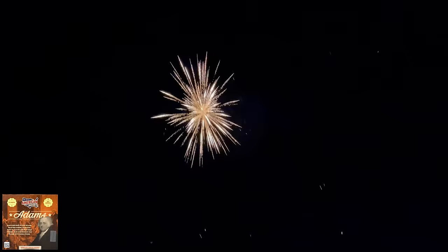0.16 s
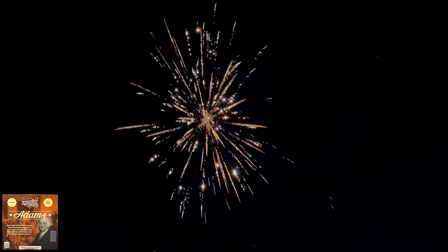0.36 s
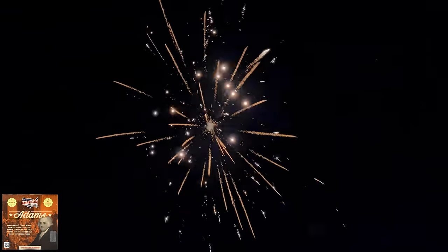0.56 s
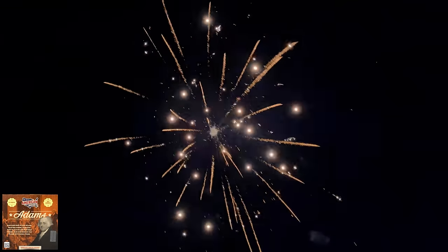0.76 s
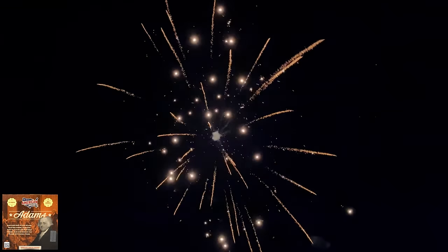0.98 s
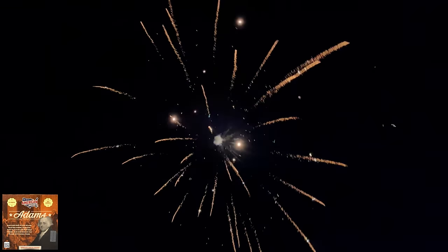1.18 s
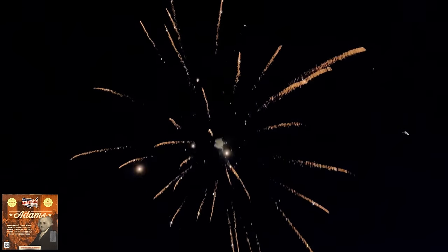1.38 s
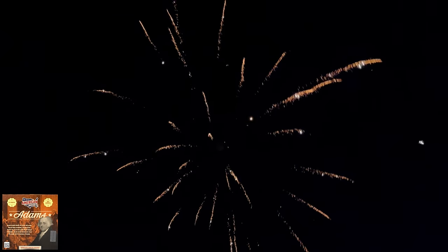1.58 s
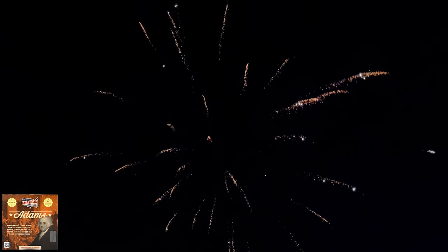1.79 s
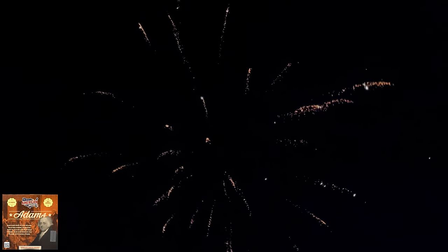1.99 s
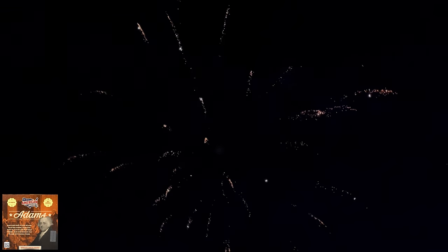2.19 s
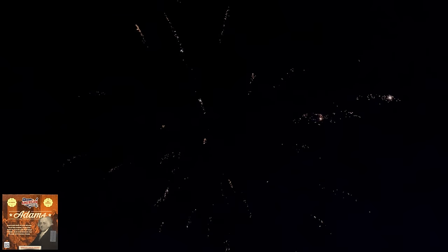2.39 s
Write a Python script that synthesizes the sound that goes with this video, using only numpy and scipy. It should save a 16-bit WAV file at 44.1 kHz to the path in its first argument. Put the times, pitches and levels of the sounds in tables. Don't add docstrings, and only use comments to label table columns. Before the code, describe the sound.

Loud firework bangs crack in the quiet night, rumble away in echoes, and another shot fires

```python
import sys
import numpy as np
from scipy import signal
from scipy.io import wavfile
from scipy.ndimage import uniform_filter1d

SR = 44100
rng = np.random.default_rng(int(sys.argv[2]) if len(sys.argv) > 2 else 0)


def output_pcm(signal):
    pcm = np.clip(np.atleast_2d(signal).T, -1, 1) * 32767
    wavfile.write(sys.argv[1], SR, np.round(pcm).astype(np.int16))


def field_ratio(decibels):
    return 10 ** (np.asarray(decibels, dtype=float) / 20)


N = 108045
BURST_S, LAUNCH_S = .232, 2.15

# (frequency [Hz], level [dB])
NIGHT_COLOUR = [(25, -32.5), (97, -3), (159, -7.5), (433, -13.5), (634, -22), (3510, -34.5), (7000, -41),
                (16500, -62)]

# (time [s], level [dB])
NEAR_LOUDNESS = [(.2318, -19), (.25, -12.5), (.27, -20.5), (.30, -24.5), (.35, -29.5), (.36, -27.5),
                 (.39, -32.5), (.5, -36), (.7, -59.5)]
FAR_LOUDNESS = [(.25, -37), (.40, -33), (.49, -38), (.54, -34), (.63, -41), (.735, -40.5), (.75, -35.5),
                (.77, -42), (.86, -53)]
LAST_LOUDNESS = [(.8, -49), (.9, -51), (.99, -47.5), (1.08, -52), (1.22, -52.5), (1.4, -57.5), (1.62, -57),
                 (1.9, -62.5)]
LAUNCH_LOUDNESS = [(2.152, -50), (2.157, -23.5), (2.165, -16), (2.174, -23), (2.186, -20.5), (2.21, -30),
                   (2.245, -41), (2.36, -47), (2.45, -55.5)]

# (frequency [Hz], level [dB])
BURST_EARLY_COLOUR = [(40, -38.5), (130, -12.5), (233, -1), (500, -6), (1100, -17), (2200, -21),
                      (6020, -25), (16500, -54)]
BURST_MIDDLE_COLOUR = [(40, -36.5), (156, -2.5), (300, -1.5), (500, -3.5), (680, -15.5), (1400, -26),
                       (5180, -34), (16500, -73.5)]
BURST_LATE_COLOUR = [(40, -48), (137, -0.5), (400, -0.5), (680, -26.5), (1300, -29), (2250, -25),
                     (5440, -24), (16500, -75.5)]
BURST_LAST_COLOUR = [(24, -59), (40, -28), (92, -6.5), (258, -2.5), (725, -11.5), (865, -7), (1840, -20.5),
                     (2200, -19.5), (16500, -67.5)]

# (frequency [Hz], level [dB])
LAUNCH_EARLY_COLOUR = [(40, -27), (258, -5.5), (497, -10.5), (900, -14.5), (2800, -24), (6330, -27),
                       (12000, -40.5), (16500, -51)]
LAUNCH_LATE_COLOUR = [(24, -64), (40, -34), (293, -4.5), (332, -20), (802, -14), (1170, -26.5), (4920, -19),
                      (10200, -34), (16500, -63)]

# (first band [dB], second band [dB], third band [dB])
NEAR_FRINGES = (11, 1, 0)
FAR_FRINGES = (15, 17, 1)
LAST_FRINGES = (1, 5, 7)
LAUNCH_FRINGES = (4, 0, 0)

# (time [s], peak [dB], pitch [Hz], length [cycles])
TICKS = [(.5200, -28, 299, 6.8), (.3562, -23, 4770, 3.6), (0.7057, -45, 4780, 6.7), (0.745, -43, 342, 6.9),
         (0.749, -45, 1700, 1.9), (1.8390, -53.5, 12000, 1.9), (1.8405, -55, 10000, 1.6),
         (1.8630, -42, 196, 1.1), (2.0520, -47, 904, 1.0), (2.0738, -49, 4280, 4.3),
         (2.0747, -46, 1580, 2.8), (2.0750, -38, 260, 0.88), (2.1000, -48, 5000, 1.6),
         (2.1135, -52.5, 6000, 2.2), (2.2560, -27.5, 1800, 0.73), (2.3177, -35, 4380, 5.1),
         (2.3180, -39.5, 8300, 4.7), (2.3183, -34, 800, 2.2)]

# (time [s], peak [dB], pitch [Hz], length [cycles])
SNAPS = [(.2315, 0, 9000, 2.0), (.2329, -6, 4000, 1.2), (.2381, -6, 1800, 1.2), (.2458, -8, 3500, 1.0),
         (.2494, -5, 4200, 2.5), (.2533, -16, 4500, 7.0), (2.1596, -12, 1100, 1.2), (2.16065, 4, 5600, 3.6),
         (2.1801, -4, 3600, 1.3), (2.1843, -7, 5000, 1.5), (2.1864, -11, 3500, 2.5)]

# (time [s], strength [dB], push before [ms], suction after [ms], rebound [ms])
SHOCKS = [
    (.2317, -2, .4, 1.35, 2.1),
    (.2357, -2, .4, 1.8, 1.6),
    (.2392, -2, .6, 1.2, 1.7),
    (.2422, -8, .1, 5.0, .3),
    (.2478, -2, .7, 1.9, 4.2),
    (.2540, -20, .2, 2.0, .8),
    (2.1604, -1, .4, 2.8, 3.4),
    (2.1652, -13, .05, 2.7, .8),
    (2.1829, -1, .7, 1.7, 1.7),
    (2.1857, -16, .1, 1.0, .5),
]


def read(points, hz):
    table_hz, level = np.transpose(points)
    return np.interp(np.log(hz + 1), np.log(table_hz + 1), level)


def evened(x):
    return x / np.sqrt(np.mean(x ** 2) + 1e-20)


def night():
    frames, hz = N // 256 + 5, np.fft.rfftfreq(1024, 1 / SR)
    real, imaginary, patches = rng.standard_normal((frames, 513, 3)).T
    patches = uniform_filter1d(patches, size=10, axis=0)
    patches = evened(uniform_filter1d(patches, size=8, axis=1))
    air = (real + 1j * imaginary) * field_ratio(read(NIGHT_COLOUR, hz)[:, None] + 1.5 * patches)

    late = np.clip((np.arange(frames) * 256 / SR - 1.9) / .15, 0, 1)
    chirp_band = np.exp(-((hz - 3750) / 180) ** 2)
    hiss_band = 0.22 * np.exp(-((hz - 6580) / 810) ** 2)
    insect = rng.standard_normal(real.shape) * (chirp_band + hiss_band)[:, None] * late

    air, insect = (evened(signal.istft(v, nperseg=1024, noverlap=768)[1][:N]) for v in (air, insect))
    return field_ratio(-57.5) * air + field_ratio(-86) * insect


def roll(loudness, shot_s, near, far, dull_s, lumps_per_s, lumpy_db, air_db, fringes_db):
    lumps_below_hz, bass_rise_s = 600, 0.039
    fringe_near_hz, fringe_far_hz, fringe_settle_s, fringe_width_hz = 1240, 770, .22, 80
    times, levels_db = np.transpose(loudness)

    hit, size = rng.random(N), rng.exponential(1, N)
    sign, wash = rng.standard_normal(N), rng.standard_normal(N)
    lumps = evened((hit < lumps_per_s / SR) * sign * field_ratio(lumpy_db * np.minimum(size, 4)))
    hz, t, low = signal.stft(lumps, SR, nperseg=1024, noverlap=896)
    high = signal.stft(wash, SR, nperseg=1024, noverlap=896)[2]
    hz, age = hz[:, None], np.maximum(t - shot_s, 0)

    settling = np.exp(-age / fringe_settle_s)
    pitch = fringe_far_hz + (fringe_near_hz - fringe_far_hz) * settling
    flat = 1 - np.exp(-(age / fringe_settle_s) ** 2)
    fringe_rise = np.minimum(age / bass_rise_s, 1) ** 2
    fringes = 0
    for k, db in enumerate(fringes_db):
        band = 1 / (1 + ((hz - (k + 1) * pitch) / fringe_width_hz) ** 2)
        fringes = fringes + db * flat ** k * fringe_rise * band

    gone = 1 - np.exp(-age / dull_s)
    air_loss = air_db * age ** 2 * np.sqrt(hz / 4000)
    colour = field_ratio((1 - gone) * read(near, hz) + gone * read(far, hz) + fringes - air_loss)
    colour /= np.sqrt((colour ** 2).mean(0))

    share = 1 / (1 + (hz / lumps_below_hz) ** 2)
    thuds = np.sqrt(share) * low * (1 - np.exp(-(age / bass_rise_s) ** 2))
    echo = (thuds + np.sqrt(1 - share) * high) * colour
    echo = signal.istft(echo, SR, nperseg=1024, noverlap=896)[1][:N]
    now = np.arange(N) / SR
    fade_db = -150 * np.maximum(now - times[-1], 0)
    return echo * field_ratio(np.interp(now, times, levels_db) + fade_db) * (now > times[0])


def snaps():
    out = np.zeros(N)
    for s, db, hz, cycles in SNAPS + TICKS:
        first = int(s * SR)
        turns = np.maximum((first + np.arange(2000)) / SR - s, 0) * hz
        shape = np.sin(np.pi * np.minimum(turns / cycles, 1) ** .7)
        out[first:first + 2000] += field_ratio(db) * shape * np.sin(2 * np.pi * turns)
    return out


def shocks():
    def on(ms_after):
        return .5 + .5 * np.tanh(ms_after / .022)

    ms, out = np.arange(N) * 1000 / SR, np.zeros(N)
    for s, db, push_ms, suction_ms, rebound_ms in SHOCKS:
        at = slice(int(s * SR) - 200, int(s * SR) + 800)
        u = ms[at] - 1000 * s
        after = np.maximum(u - suction_ms, 0) / rebound_ms
        push = .9 * on(u + push_ms) * on(-u)
        suction = on(u) * on(suction_ms - u) * (1 - .8 * u / suction_ms)
        rebound = .95 * on(u - suction_ms) * (1 - after ** 2) * np.exp(-after ** 2)
        out[at] += field_ratio(db) * (push - suction + rebound)
    return out


def scene():
    near = roll(NEAR_LOUDNESS, BURST_S, BURST_EARLY_COLOUR, BURST_MIDDLE_COLOUR, dull_s=.3,
                lumps_per_s=1500, lumpy_db=1.8, air_db=1.5, fringes_db=NEAR_FRINGES)
    far = roll(FAR_LOUDNESS, BURST_S, BURST_MIDDLE_COLOUR, BURST_LATE_COLOUR, dull_s=0.52,
               lumps_per_s=900, lumpy_db=1.5, air_db=1.5, fringes_db=FAR_FRINGES)
    last = roll(LAST_LOUDNESS, BURST_S, BURST_LATE_COLOUR, BURST_LAST_COLOUR, dull_s=1.0,
                lumps_per_s=700, lumpy_db=1.7, air_db=1.0, fringes_db=LAST_FRINGES)
    launch = roll(LAUNCH_LOUDNESS, LAUNCH_S, LAUNCH_EARLY_COLOUR, LAUNCH_LATE_COLOUR, dull_s=0.26,
                  lumps_per_s=1500, lumpy_db=2.4, air_db=130, fringes_db=LAUNCH_FRINGES)
    return (night() + near + far + last + launch + snaps() + shocks())[None]


def band_limit(x):
    return signal.sosfilt(signal.butter(12, 17040, fs=SR, output="sos"), x)


def record(dry):
    ceiling = field_ratio(-3.7 + .6 * np.arange(N) / SR)
    bass_cut = signal.butter(2, 86, "high", fs=SR, output="sos")
    x = signal.sosfilt(bass_cut, dry) / ceiling
    x = ceiling * x / (1 + abs(x) ** 5) ** (1 / 5)
    x = signal.oaconvolve(x, signal.firwin(63, 16500, fs=SR)[None], "same")
    return band_limit(x)


dry = scene()
out = record(dry)
output_pcm(out)
```